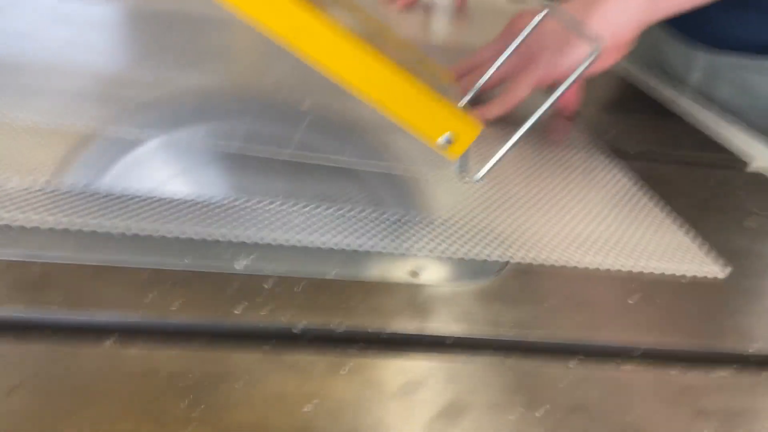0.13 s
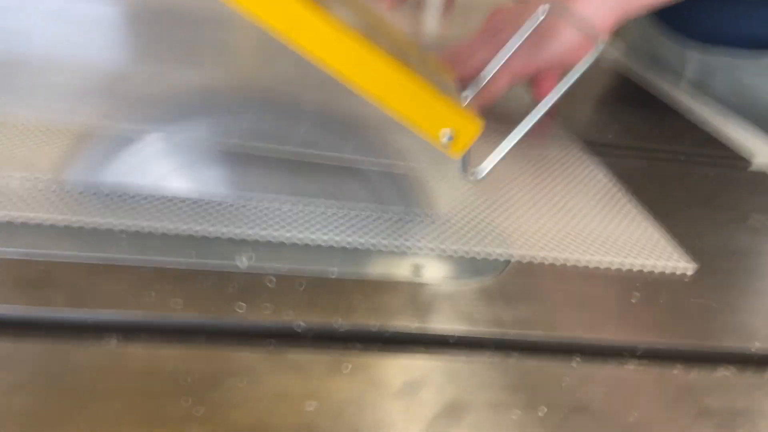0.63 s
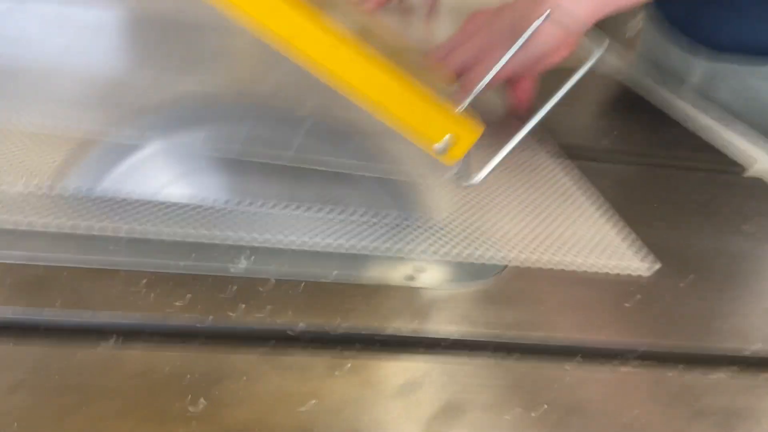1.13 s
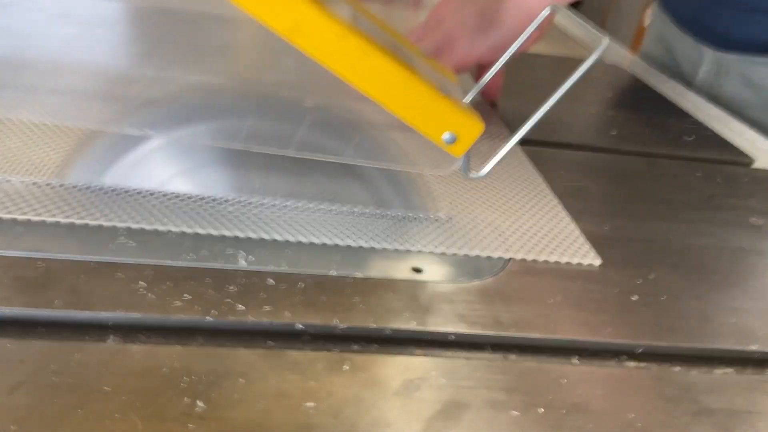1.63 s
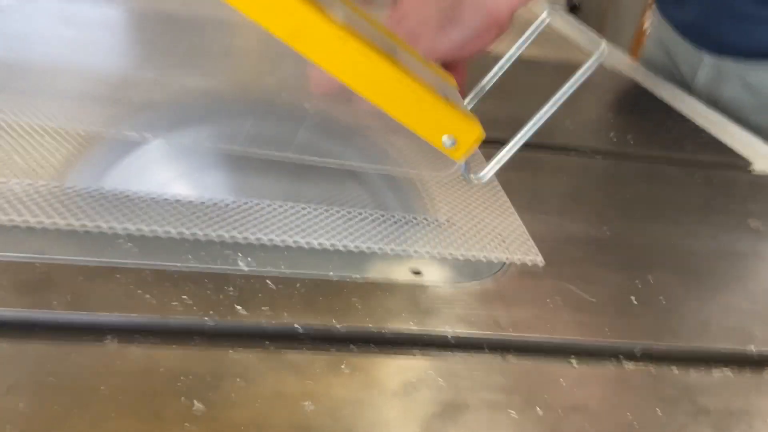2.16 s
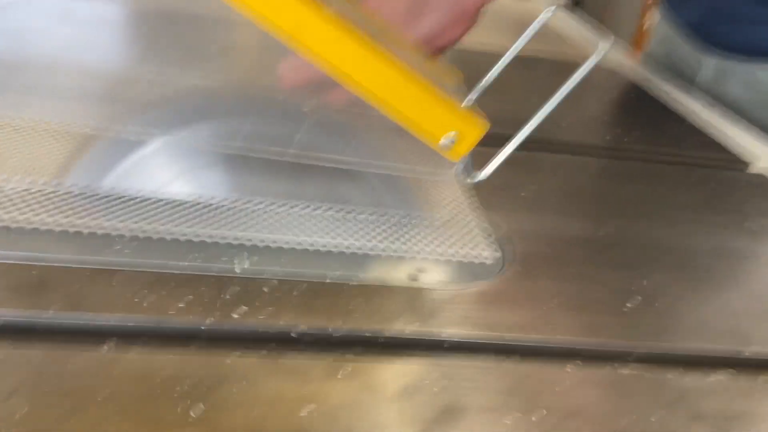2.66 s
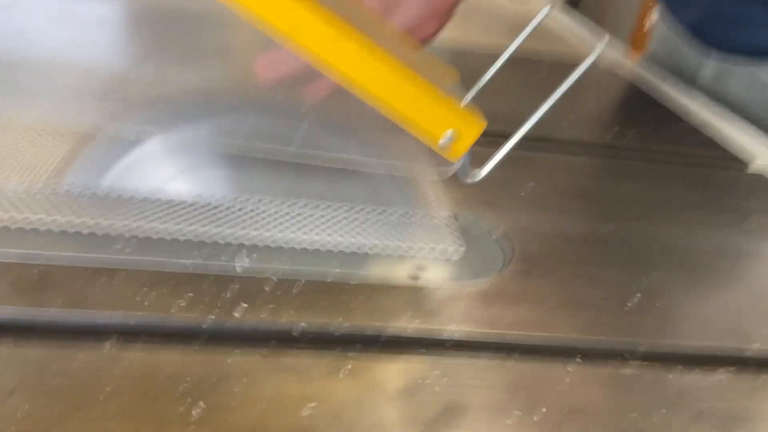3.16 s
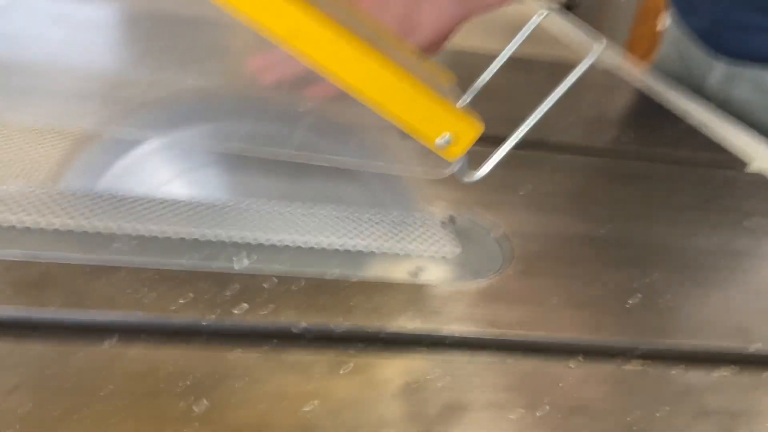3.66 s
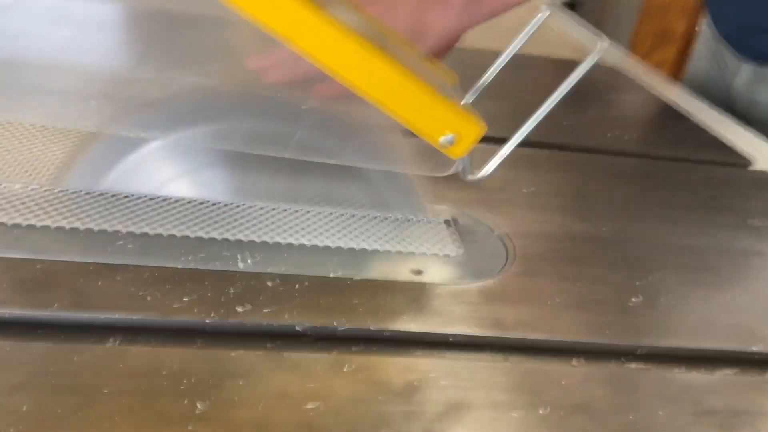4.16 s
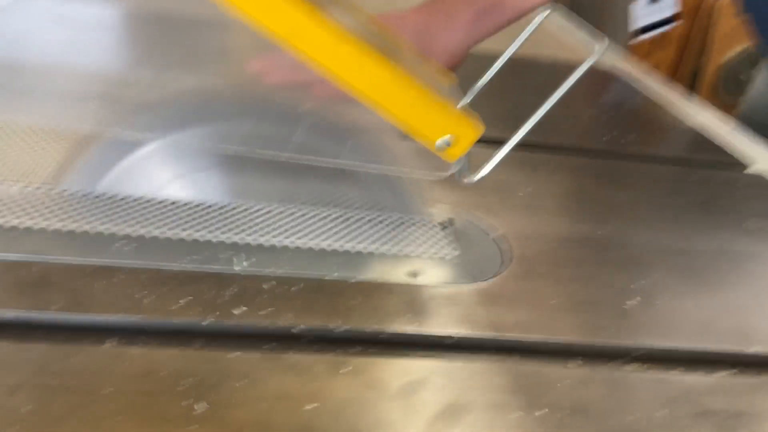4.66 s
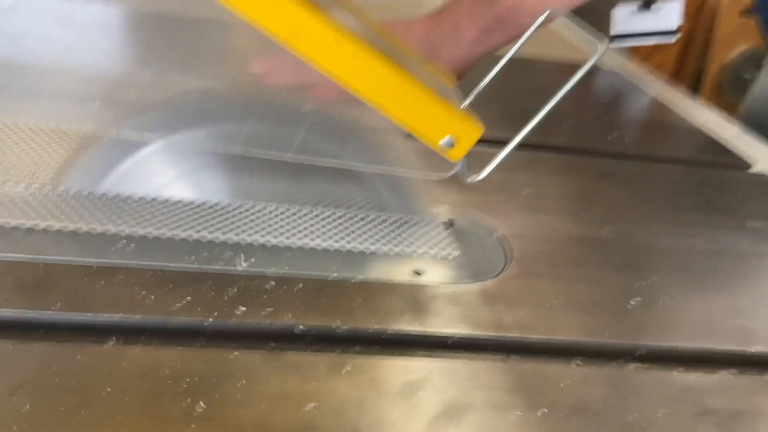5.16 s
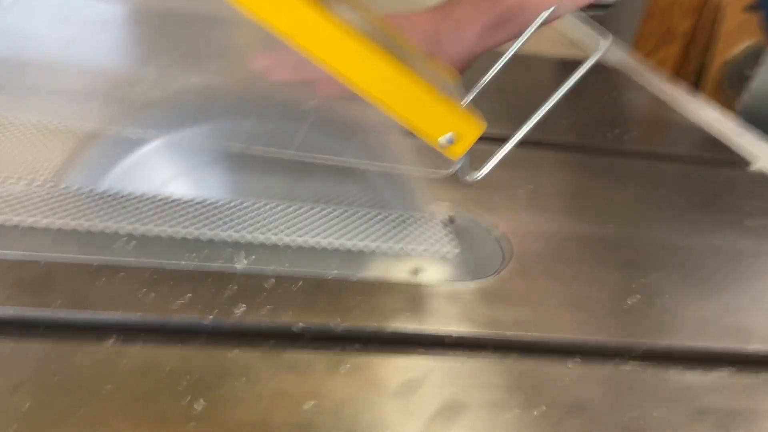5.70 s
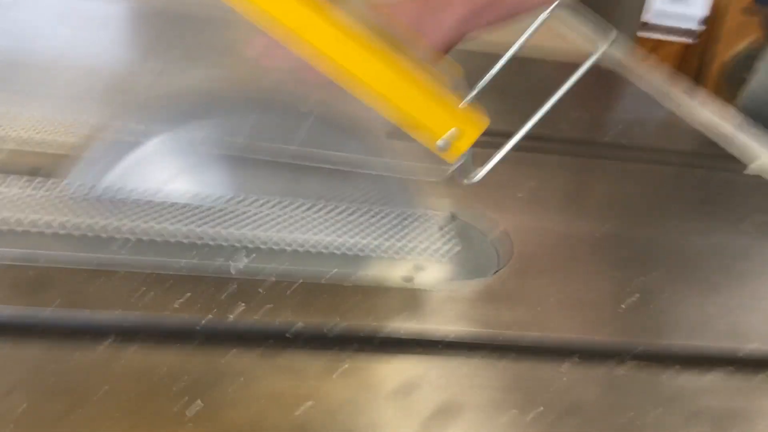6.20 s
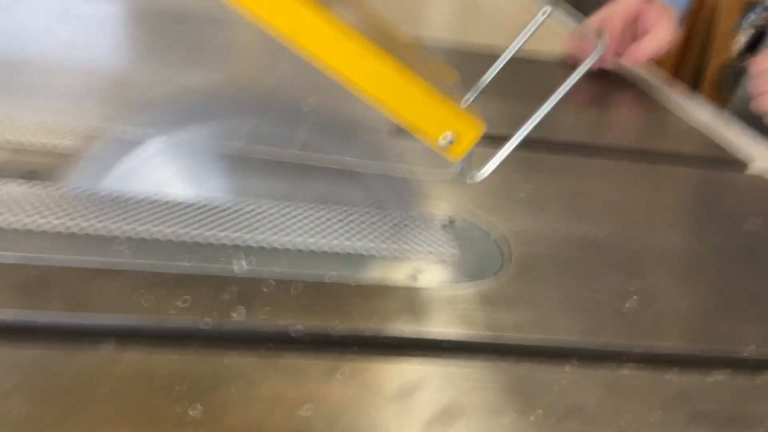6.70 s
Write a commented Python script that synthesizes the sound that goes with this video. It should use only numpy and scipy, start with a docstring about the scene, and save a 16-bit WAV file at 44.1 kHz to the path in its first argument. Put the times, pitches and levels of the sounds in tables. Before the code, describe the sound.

A table saw hisses and sings harshly through a thin plastic sheet, brushes the loose strip in fading rasps, then whines on freely in a workshop.

```python
"""In a workshop a table saw finishes a cut through a thin plastic sheet, then runs free.
Chips torn at random hiss and ring the blade; tones locked to the turn sing; the loose strip rubs late on.
The drive whines on every tenth multiple of the blade's turn, over motor hum, air rush and a low rumble.
Two spaced microphone ports hear it with level, phase and likeness that depend on frequency."""
import sys
import numpy as np
from scipy import signal
from scipy.io import wavfile
from scipy.ndimage import uniform_filter1d

SR = 44100
rng = np.random.default_rng(int(sys.argv[2]) if len(sys.argv) > 2 else 0)


def voltage_ratio(decibels):
    """Convert decibels (scalar or array-like) to amplitude ratios, 20 dB per decade."""
    exponent = np.asarray(decibels, float) / 20
    return 10 ** exponent


def transcribe(signal):
    """Save signal, clipped to [-1, 1], as a 16-bit WAV file at the path in sys.argv[1]."""
    frames = np.atleast_2d(signal).T
    limited = np.clip(frames, -1, 1)
    pcm = np.round(limited * 32767).astype(np.int16)
    wavfile.write(sys.argv[1], SR, pcm)


N = 300762
T = np.arange(N) / SR
SIZE, HOP = 2048, 512  # short-time spectra, samples

# effort of the cut: (t/s, tooth hiss level/dB)
CUT_EFFORT = [(0, -29.5), (.06, -29), (.4, -32), (.52, -32.5), (.6, -31), (1.25, -31.5), (1.3, -31),
              (2, -29), (2.4, -31), (2.9, -31), (3.0, -32.5), (3.18, -37), (3.22, -35), (3.3, -36),
              (3.35, -39), (3.45, -44), (3.6, -79)]
# buzz, ring and hiss bands of the cut: (lower f/Hz, upper f/Hz)
CUT_BANDS = [(2150, 4000), (4500, 8000), (9600, 12600)]
# broad colour of the cutting hiss: (f/Hz, relative density/dB per Hz)
HISS_COLOUR = [(200, -13.5), (900, -9), (1600, -9), (2400, -4), (3600, -9), (4200, -10.5), (5200, -12.5),
               (6300, -17), (7200, -8), (8300, -0.5), (9200, -1.5), (10100, -0.5), (10600, 7), (11600, 3),
               (12600, 1), (13600, -4), (14900, -3.5), (15600, -6)]
# broad blade modes that the hiss rings: (f/Hz, width/Hz, level/dB before MODES_DB)
BLADE_MODES = [(1500, 16, -14), (1770, 38, -11), (2070, 25, -2), (2220, 20, -11), (2550, 32, -11),
               (2760, 27, -7), (3100, 24, -2), (3240, 15, -12), (3440, 27, -13), (3760, 63, -15),
               (4120, 46, -5), (4380, 17, -14), (4510, 15, -14), (4610, 18, -13), (4880, 85, -11),
               (5070, 19, -18), (5570, 31, -5), (5790, 48, -10), (6200, 33, -8), (6960, 35, -7),
               (7160, 150, -6), (7710, 85, -8), (8260, 98, -8), (9210, 73, -20), (9500, 30, -13),
               (10300, 26, 0), (10700, 160, -3), (11700, 44, -8), (12000, 30, -4), (12400, 35, -8)]
# narrow gaps heard in the noise while the cut lasts: (f/Hz, width/Hz, depth/dB before it wanders)
NOISE_GAPS = [(260, 50, 4), (520, 100, 6), (810, 120, 8), (1000, 140, 6), (1660, 70, 4), (2380, 150, 9),
              (2640, 100, 9), (2960, 140, 10), (3320, 120, 9), (3600, 150, 10), (3890, 110, 8),
              (4320, 60, 7), (4440, 50, 6), (4720, 90, 7), (5090, 200, 11), (5690, 70, 3), (5890, 60, 6),
              (6600, 260, 13), (7950, 150, 6), (14700, 150, 6), (15330, 150, 7)]
# the loose strip brushes the teeth: (t/s, tooth hiss level/dB, decay t60/s)
RUBS = [(3.385, -32, 0.76), (3.5, -37, 0.28), (3.767, -45, .4), (3.87, -44, .3), (3.955, -39.5, .35),
        (4.07, -39, 0.37), (4.274, -43, 0.54), (4.32, -39.5, .4), (4.39, -45, 0.49), (4.506, -42.5, 0.65),
        (4.6, -48, 0.9), (4.75, -44, .4), (4.826, -42.5, 0.86), (4.87, -47, 0.88), (5.07, -48, .4),
        (5.14, -46, .4), (5.4, -50, .6), (5.58, -50, .6)]
# loud tones of the loaded blade: (multiple of the turn, left-right level/dB, left lead/rad)
SING_TONES = [(30, 0, .1), (40, 2, 1.3), (45, 2, .6), (81, 2, .7), (150, 0, 1.2), (174, 0, -1.2)]
# for each of those tones: (level/dB against the tooth hiss, level change/dB as the sheet runs out, waver 0-1)
SING_LEVELS = [(-8.5, 0, .06), (-12, -3, .15), (-13, -12, .25), (-14.5, 4, .25), (-5.5, 0, .08),
               (-10.5, -2, .15)]
# tones that flare up: multiple of the turn -> rows of (middle t/s, length/s before a stretch, level/dB)
FLARES = {45: [(.27, .12, -46), (.47, .12, -41), (.75, .32, -35.5), (.98, .25, -38.5), (1.27, .24, -37),
          (1.5, .3, -43), (1.72, .17, -40), (2.03, .22, -42), (2.66, .22, -44)], 81: [(.12, .26, -40),
          (.65, .13, -40), (2.14, .24, -39), (3.43, .13, -38), (3.54, .22, -44)]}
# faint tones of uneven teeth: (multiple of the turn, level/dB before effort and waver,
# left-right level/dB, left lead/rad)
FAINT_TONES = [(37, -48.0, 8.0, -0.5), (47, -49.0, 4.0, 1.1), (50, -50.0, 3.0, 0.8), (61, -54.0, 2.0, -0.0),
               (67, -51.0, 2.0, 0.0), (70, -51.0, 5.0, 0.6), (71, -49.0, 5.0, 0.5), (77, -51.0, 12.0, 0.2),
               (80, -49.0, 8.0, 0.6), (87, -53.0, 4.0, 1.0), (88, -51.0, 5.0, 0.6), (89, -54.0, 5.0, 0.1),
               (90, -46.0, 1.0, 0.6), (92, -52.0, 5.0, 0.9), (99, -54.0, 3.0, 0.0), (100, -50.0, 1.0, 0.2),
               (101, -47.0, 2.0, 0.0), (104, -45.0, 2.0, -0.3), (105, -50.0, 1.0, -0.3),
               (111, -48.0, 2.0, -0.9), (112, -46.0, 1.0, -1.1), (119, -45.0, 0.0, -1.9),
               (120, -43.0, 1.0, -2.0), (138, -44.0, -0.0, 2.5), (143, -52.0, -1.0, 1.9),
               (153, -44.0, 0.0, 0.8), (155, -45.0, -0.0, 0.6), (157, -43.0, 0.0, 0.4),
               (160, -45.0, 1.0, 0.1), (169, -49.0, -1.0, -0.6), (180, -42.0, -0.0, -1.9),
               (209, -52.0, 1.0, 1.3), (210, -46.0, -0.0, 1.3)]
# sharp modes of the blade plate: (f/Hz, width/Hz, level/dB before effort and PLATE_DB, left-right level/dB)
PLATE_MODES = [(1497, 8, -53, 4), (1771, 10, -51, 4), (2229, 8, -50, 3), (4032, 8, -54, 3),
               (4091, 12, -46, 4), (4377, 8, -54, 4), (4506, 8, -54, 4), (4860, 10, -56, 5),
               (5066, 12, -58, 5), (5488, 10, -52, 4), (5800, 20, -50, 4), (6056, 8, -52, 4),
               (6950, 10, -50, 2), (7262, 14, -50, 2), (9502, 10, -50, 0), (10680, 12, -45, 0),
               (11407, 10, -49, 0), (12470, 10, -52, 0)]
# dull knock of the sheet on the table: (t/s, level/dB)
KNOCKS = [(0.571, -31)]
# drive whine: (multiple of the turn, level/dB before RUN_LEVELS, left-right level/dB, left lead/rad)
WHINE_TONES = [(10, -41.0, -0.0, 0.3), (20, -44.0, 1.0, -0.5), (30, -49.0, -2.0, 3.1),
               (40, -59.0, 3.0, 1.1), (50, -51.0, 7.0, 0.5), (60, -43.0, 5.0, 0.4), (70, -60.0, 6.0, 0.4),
               (80, -57.0, 9.0, 1.0), (90, -54.0, 3.0, 1.1), (100, -53.0, 1.0, 0.0),
               (110, -68.0, 0.0, -0.2), (120, -47.0, 1.0, -2.0), (130, -66.0, 0.0, -3.1),
               (140, -55.0, -0.0, 2.2), (150, -51.0, 0.0, 1.1), (160, -60.0, 0.0, -0.0),
               (170, -62.0, 0.0, -0.6), (180, -51.0, -0.0, -1.9), (190, -71.0, -0.0, -3.1),
               (200, -72.0, -1.0, 3.0), (210, -62.0, 0.0, 1.1), (220, -65.0, -0.0, 0.0)]
# level of the drive whine and air rush; the air dips under the cut and returns afterwards:
# (t/s, whine level/dB, air level/dB)
RUN_LEVELS = [(0, -0.5, 0.5), (2, -1.2, -7), (3.2, -1.1, -1), (3.6, -2.2, -3), (4, 0, -1.5),
              (6.82, 0.3, -0.5)]
# motor hum in the cabinet: (f/Hz, level/dB, waver width/Hz, share that wavers 0-1,
# level added under the sheet/dB, level added in the surge/dB)
HUM_LINES = [(59.4, -46, 0.9, 0.19, 0, 4.5), (78.2, -46.5, 11, 0.86, -1.5, 0), (90, -55, 4.8, 1, 4, 5),
             (122.2, -52.5, 5.3, 0, 1.5, 4.5), (183.6, -56.5, 3.7, 0.6, 7, 2),
             (203.3, -60, 1.36, 0.25, 12.5, 10)]
# air stirred by blade and motor fan: (f/Hz, density/dB per Hz before RUN_LEVELS)
AIR_COLOUR = [(150, -70.5), (400, -74), (900, -79), (1900, -70), (2600, -73), (4200, -74.5), (4700, -82),
              (6000, -83.5), (8000, -81), (8700, -82.5), (10700, -83.5), (12200, -87), (13200, -94),
              (15600, -100)]
# low rumble: (f/Hz, density/dB per Hz)
RUMBLE_COLOUR = [(20, -98), (35, -95), (55, -66), (90, -72), (140, -71), (250, -81), (400, -94)]
# microphone pair: (f/Hz, likeness 0-1, left-right level/dB, left lead/rad before the treble delay)
PORTS = [(40, 1, 6, 0.66), (200, 0.72, -0.5, 0), (800, 0.49, 5, 0), (1390, 0, 1, 0.057), (3030, 0.72, 4, 1),
         (4400, 1, 4, 1), (5600, 0.9, 7.5, 1), (6400, 0.8, 4.5, 0.93), (6940, 1, 5, 1), (7800, 0.92, 0, 0),
         (16000, 1, 0, 0)]

# blade speed in turns/s: slightly slowed under load, recovering across FREEING_S
LOADED_PER_S, FREE_PER_S, FREEING_S = 68.838, 68.892, (2.9, 3.9)
SHEET_S = (2.0, 3.3)  # the sheet runs out
BUZZ_DB, RING_DB = -9.5, 0.5  # lower bands of the cut against the tooth hiss
BUZZ_LOSS_DB, RING_LOSS_DB = -6.5, -1.5  # their change as the sheet runs out
RUB_BUZZ_DB, RUB_RING_DB = -15, -0.5  # lower bands of a rub against its hiss
RUB_RISE_S = 0.0059
GRAZE_DB, GRAZE_DB_PER_S = -50, -4  # faint graze under the rubs, falling from the end of the cut
FULL_DB = -24.5  # ring band level that counts as full effort
MODES_DB = 1  # broad blade modes against the broad hiss
PLATE_DB = 8  # sharp modes as a whole
SURGE_S, SURGE_EDGE_S = (4, 4.94), 0.12  # the hum swells for a second
# the left port lags in the treble: one full turn of phase for every DELAY_TURN_HZ above DELAY_FROM_HZ
DELAY_FROM_HZ, DELAY_TURN_HZ = 6910, 4230


def cut(turns, hz, t, gaps_db):
    """Chips torn at random ring the blade's modes; the hiss throbs in step with the turn."""
    power = voltage_ratio(read(HISS_COLOUR, hz)) ** 2
    for f, width, db in BLADE_MODES:
        power += voltage_ratio(db + MODES_DB) ** 2 / (1 + (2 * (hz - f) / width) ** 2) ** 2.4
    band_db = [10 * np.log10(power[(hz > lo) & (hz < hi)].sum() * hz[1]) for lo, hi in CUT_BANDS]
    # the moving balance of the three bands, spread over log frequency
    level_db = contact(t)
    lift_db = (level_db - level_db[2]).T - band_db
    middles = np.log(np.sqrt(np.prod(CUT_BANDS, axis=1)))
    balance_db = np.array([np.interp(np.log(hz + 1), middles, row) for row in lift_db]).T
    field_db = balance_db + gaps_db + 10 * np.log10(power)[:, None]
    pattern = teeth(turns, len(t), hold_s=0.3)
    hiss = noise(field_db, hz, patchy_db=1.5, pattern=pattern, share=0.045)
    throb = 1
    for k, depth in [(1, 0.08), (3, 0.06), (4, 0.065), (7, 0.02)]:  # times a turn
        throb = throb + depth * np.cos(2 * np.pi * k * turns + k)
    flutter = 1 + 0.21 * slow(13).real
    return hiss * voltage_ratio(contact(T)[2]) * throb * flutter


def teeth(turns, frames, hold_s):
    """Spectra of a force that repeats each turn, as the same teeth return, and slowly changes its shape."""
    stage = T / hold_s
    shapes = rng.standard_normal((2, 64, SIZE // 2))  # both ports, one turn each
    first = stage.astype(int) % 63
    spot = (turns % 1 * SIZE / 2).astype(int)
    blend = stage % 1 * np.pi / 2
    force = np.cos(blend) * shapes[:, first, spot] + np.sin(blend) * shapes[:, first + 1, spot]
    padded = np.pad(force, ((0, 0), (0, 2 * SIZE)))
    z = signal.stft(padded, nperseg=SIZE, noverlap=SIZE - HOP)[2][..., :frames]
    return z * np.sqrt(2 * SIZE)  # a repeating part adds up across frames, so it needs less gain than chance


def contact(t):
    """Buzz, ring and hiss levels of tooth contact: the cut, the graze, and rubs that start fast and die away."""
    end = CUT_EFFORT[-1][0]
    power = voltage_ratio(GRAZE_DB + GRAZE_DB_PER_S * (t - end)) ** 2 * ramp(t, (end - 0.2, end))
    for s, db, t60 in RUBS:
        part = slice(*np.searchsorted(t, [s, s + t60]))
        u = t[part] - s
        power[part] += (np.minimum(u / RUB_RISE_S, 1) * voltage_ratio(db - 60 * u / t60)) ** 2
    rub_gain = voltage_ratio(np.array([[RUB_BUZZ_DB], [RUB_RING_DB], [0]]))
    return 10 * np.log10(voltage_ratio(cutting(t)) ** 2 + rub_gain ** 2 * power)


def cutting(t):
    """Buzz, ring and hiss levels of the cut itself, the lower bands fading more as the sheet runs out."""
    gone = ramp(t, SHEET_S)
    against_hiss = [BUZZ_DB + BUZZ_LOSS_DB * gone, RING_DB + RING_LOSS_DB * gone, 0 * gone]
    return curves(CUT_EFFORT, t) + np.array(against_hiss)


def effort():
    """Gain of the blade's tones and sharp modes, from the ring band of tooth contact."""
    return voltage_ratio(contact(T)[1] - FULL_DB)


def noise_gaps(hz, t):
    """Narrow gaps in cut hiss and air: their depth wanders at random, and they close as the cut ends."""
    wander = uniform_filter1d(rng.standard_normal((len(NOISE_GAPS), len(t))), size=6, axis=1)
    closing = np.clip((CUT_EFFORT[-1][0] - t) / 0.4, 0, 1)
    depth = np.maximum(1.4 + 0.9 * wander / wander.std(), 0) * closing
    return -sum(db * np.exp(-(2 * (hz - f) / width) ** 2)[:, None] * d
                for (f, width, db), d in zip(NOISE_GAPS, depth))


def sing(turns):
    """The cut pushes the blade alike on every turn: loud tones on its modes, faint ones that come and go."""
    hiss_db, gone = cutting(T)[2], ramp(T, SHEET_S)
    loud = 0
    for (k, pan_db, lead), (db, loss_db, waver) in zip(SING_TONES, SING_LEVELS):
        size = voltage_ratio(hiss_db + db + loss_db * gone) * (1 + waver * slow(1.3))
        size = (size + flares(FLARES.get(k, []))) * (1 + 0.058 * slow(28))
        loud = loud + tone(k * turns, size, pan_db, lead)
    faint = sum(tone(k * turns, voltage_ratio(db) * (1.5 + 0.35 * slow(2.3)), pan_db, lead)
                for k, db, pan_db, lead in FAINT_TONES)
    return loud + effort() * faint


def flares(rows):
    """Smooth bumps of level."""
    return sum(voltage_ratio(db) * np.cos(np.pi * np.clip((T - s) / (1.26 * length), -0.5, 0.5)) ** 2
               for s, length, db in rows)


def plate():
    """Sharp modes of the blade plate, shaken by the chips: narrow bands of noise that follow the effort."""
    modes = sum(tone(f * T, voltage_ratio(db) * slow(width), pan_db, lead_of(f))
                for f, width, db, pan_db in PLATE_MODES)
    return effort() * voltage_ratio(PLATE_DB) * modes


def knocks():
    """The sheet's dull knock on the table: a low push that dies within a few cycles."""
    out = np.zeros(N)
    for s, db in KNOCKS:
        u = np.maximum(T - s, 0)
        out += voltage_ratio(db) * 2 * np.sin(2 * np.pi * 140 * u) * np.exp(-u / 0.0049)
    return out


def whine(turns):
    """Drive tones with a slight flutter; odd upper tens drift more, an extra tone on the 20th grows under load."""
    total = tone(20 * turns + 0.2, voltage_ratio(-54) * effort(), -10, 0.5)
    fading = voltage_ratio(-7 * np.clip((T - 5.2) / 0.95, 0, 1))  # the fifth tone sinks into the air rush
    for k, db, pan_db, lead in WHINE_TONES:
        drifts = k % 20 > 0 and k > 10
        waver = 1 + 0.073 * slow(34) + 0.05 * drifts * slow(2.9)
        size = voltage_ratio(db) * (fading if k == 50 else 1) * waver
        total = total + tone(k * turns + (k / 10) ** 2 / 10 * 0.5, size, pan_db, lead)
    return total


def hum():
    """Low motor lines, each with its own steady and wavering parts."""
    sheet = 1 - ramp(T, (1.7, 3.0))
    start, stop = SURGE_S
    rise = ramp(T, (start - SURGE_EDGE_S, start + SURGE_EDGE_S))
    fall = ramp(-T, (-stop - SURGE_EDGE_S, -stop + SURGE_EDGE_S))
    surge = rise * fall
    total = 0
    for f, db, width, share, sheet_db, surge_db in HUM_LINES:
        level = voltage_ratio(db + sheet_db * sheet + surge_db * surge)
        total = total + tone(f * T, level * (1 - share + share * slow(width)), 0, 0.093)
    return total


def air(hz, t, gaps_db):
    """Random rush of stirred air over a low rumble; the noise is lumpier where the rush dips."""
    dip_db = curves(RUN_LEVELS, t)[1]
    rush = voltage_ratio(read(AIR_COLOUR, hz)[:, None] + dip_db) ** 2 * (hz > 100)[:, None]
    rumble = voltage_ratio(read(RUMBLE_COLOUR, hz)[:, None]) ** 2
    field_db = 10 * np.log10(rush + rumble) + gaps_db
    return noise(field_db, hz, patchy_db=1.02 - 0.59 * np.minimum(dip_db, 0))


def noise(field_db, hz, patchy_db, pattern=0, share=0):
    """Random short-time spectra of the given density, heard by both ports; a share may follow a pattern."""
    a, b, c, d, patches = rng.standard_normal((field_db.shape[1], len(hz), 5)).T
    patches = uniform_filter1d(uniform_filter1d(patches, size=6, axis=0), size=14, axis=1)
    same = read(PORTS, hz)[:, None]
    pan_db = read(PORTS, hz, index=2)[:, None]
    chance = np.array([a + 1j * b, c + 1j * d])
    right, other = np.sqrt(1 - share) * chance + np.sqrt(share) * pattern
    left = same * right * np.exp(1j * lead_of(hz))[:, None] + np.sqrt(1 - same ** 2) * other
    z = np.array([left * voltage_ratio(pan_db / 2), right * voltage_ratio(-pan_db / 2)])
    z *= voltage_ratio(field_db + patchy_db * patches / patches.std())
    wave = signal.istft(z, nperseg=SIZE, noverlap=SIZE - HOP)[1][:, :N]
    return np.sqrt(SR * 3 / 2 / SIZE) * wave


def tone(turns, size, pan_db=0, lead=0):
    """A sine of rms size (complex sizes waver in phase) set between the ports."""
    wave = np.sqrt(2) * size * np.exp(2j * np.pi * turns)
    left = (wave * voltage_ratio(pan_db / 2) * np.exp(1j * lead)).real
    right = (wave * voltage_ratio(-pan_db / 2)).real
    return np.array([left, right])


def lead_of(hz):
    """Radians by which the left port leads, with its delay in the treble."""
    return read(PORTS, hz, index=3) - 2 * np.pi * np.maximum(hz - DELAY_FROM_HZ, 0) / DELAY_TURN_HZ


def slow(width_hz):
    """Complex noise that wanders within the given width, of unit power at points joined by straight lines."""
    a, b = rng.standard_normal((2, N // HOP + 2))
    r = np.exp(-np.pi * width_hz * HOP / SR)
    steps = np.r_[a[0] + 1j * b[0], (a + 1j * b)[1:] * np.sqrt(1 - r * r)]
    z = signal.lfilter([1], [1, -r], steps) / np.sqrt(2)
    return np.interp(T, np.arange(len(z)) * HOP / SR, z)


def read(points, hz, index=1):
    """A table column against log frequency."""
    table = np.transpose(points)
    return np.interp(np.log(hz + 1), np.log(table[0] + 1), table[index])


def curves(rows, t):
    """All columns of a table against time."""
    s, *columns = np.transpose(rows)
    return np.array([np.interp(t, s, c) for c in columns])


def ramp(t, span):
    """Rises from 0 to 1 across the span."""
    return np.clip((t - span[0]) / (span[1] - span[0]), 0, 1)


def scene():
    """The cut on top of the running saw."""
    speed = LOADED_PER_S + (FREE_PER_S - LOADED_PER_S) * ramp(T, FREEING_S)
    turns = np.cumsum(speed) / SR
    hz = np.fft.rfftfreq(SIZE, 1 / SR)
    t = np.arange(N // HOP + 5) * HOP / SR
    gaps_db = noise_gaps(hz, t)
    worked = cut(turns, hz, t, gaps_db) + sing(turns) + plate() + knocks()
    running = voltage_ratio(curves(RUN_LEVELS, T)[0]) * whine(turns) + hum() + air(hz, t, gaps_db)
    return worked + running


def roll_off(x):
    """The treble ends steeply here."""
    return signal.sosfilt(signal.butter(12, 16430, fs=SR, output="sos"), x)


def record(dry):
    """Both ports lose everything above a steep treble edge."""
    lowpass = signal.firwin(511, 15720, window=("kaiser", 9), fs=SR)  # edge in Hz
    limited = signal.oaconvolve(dry, lowpass[None], "same")
    return roll_off(limited)


dry = scene()
out = record(dry)
transcribe(out)
```